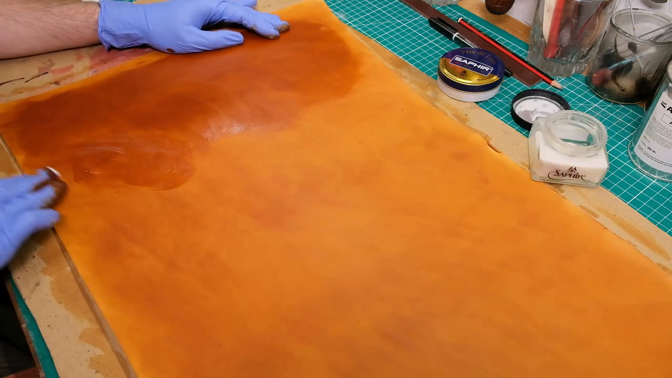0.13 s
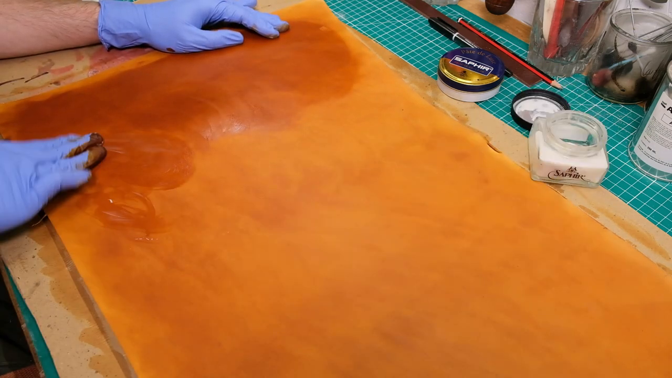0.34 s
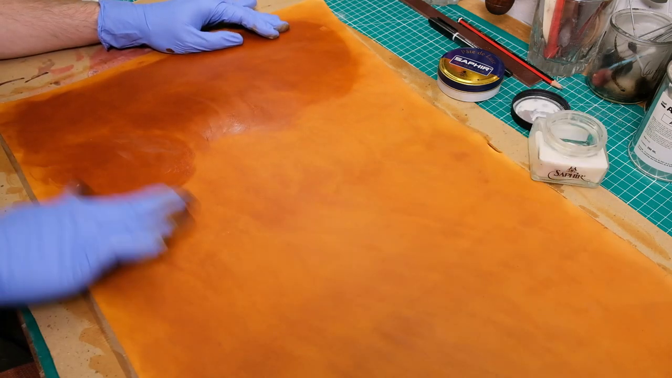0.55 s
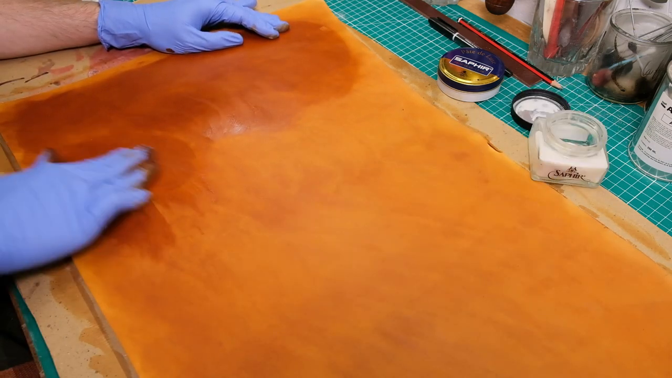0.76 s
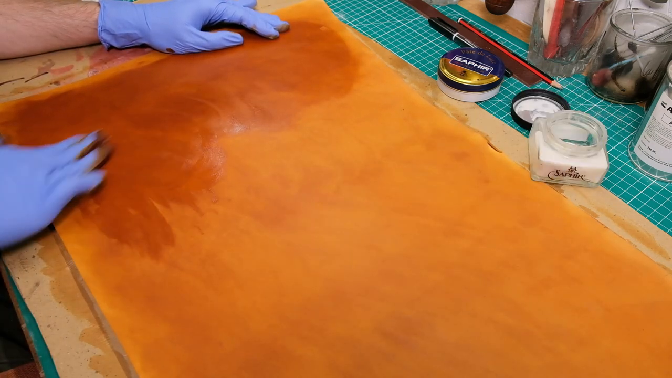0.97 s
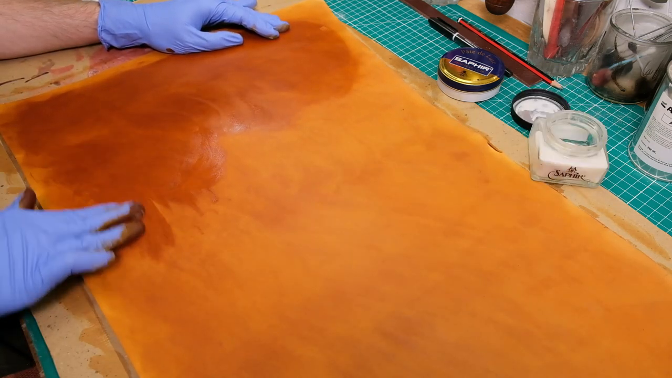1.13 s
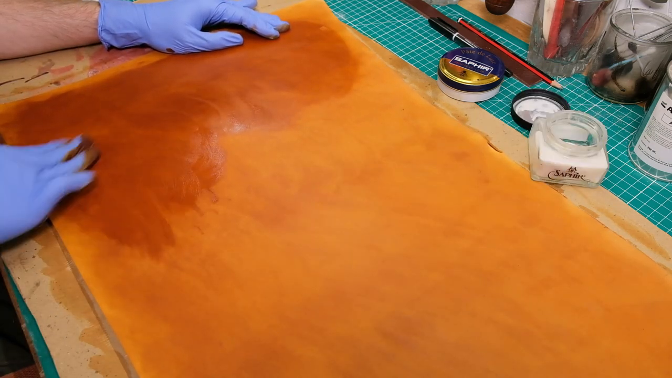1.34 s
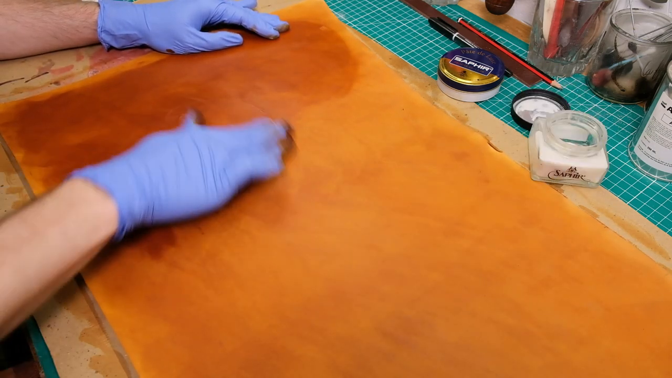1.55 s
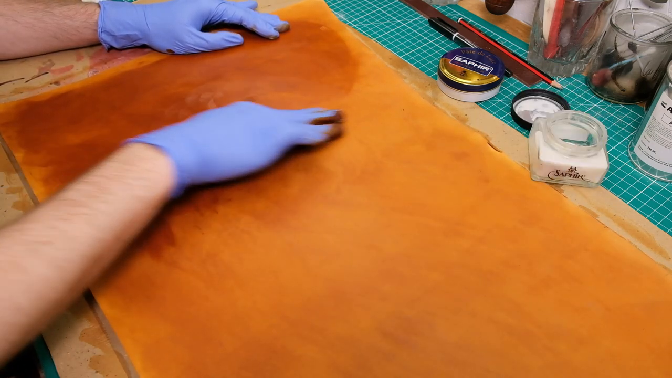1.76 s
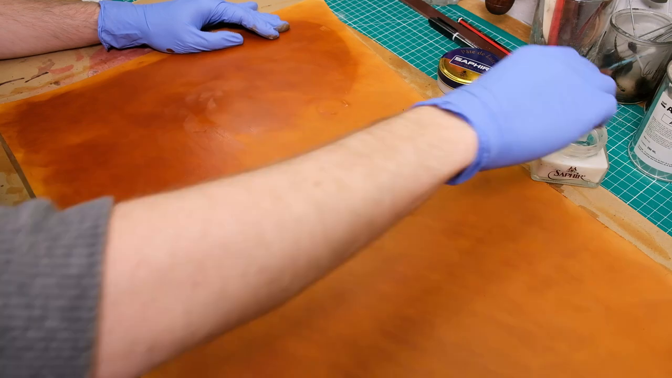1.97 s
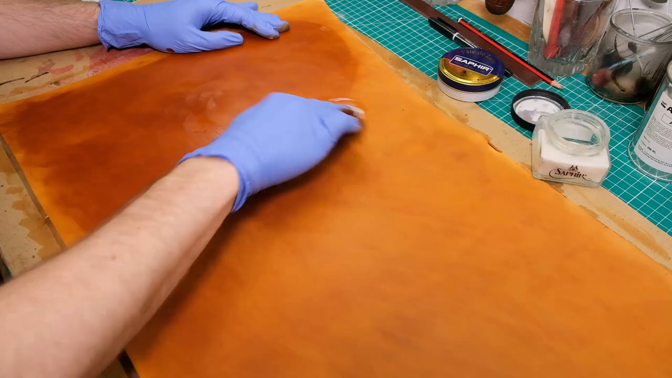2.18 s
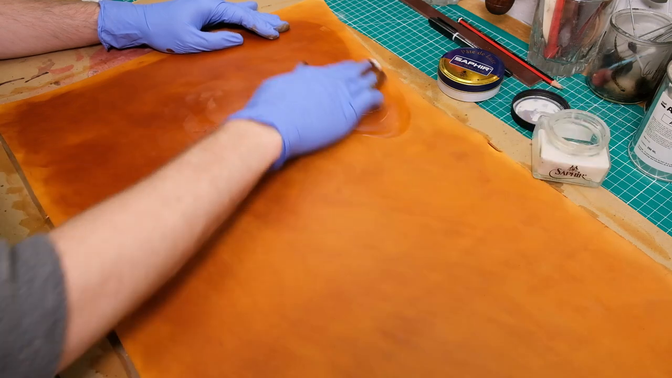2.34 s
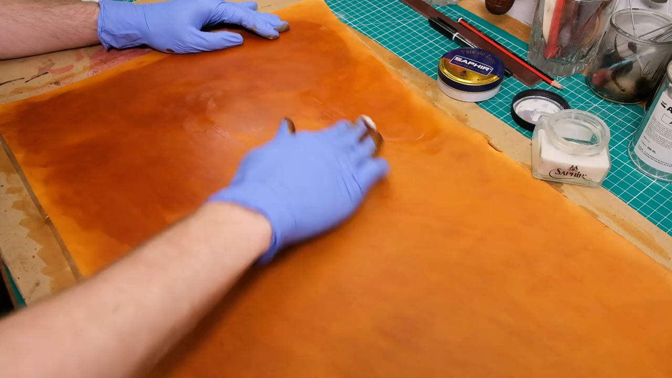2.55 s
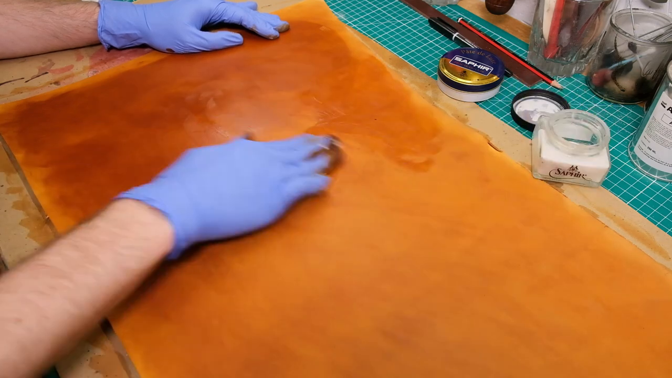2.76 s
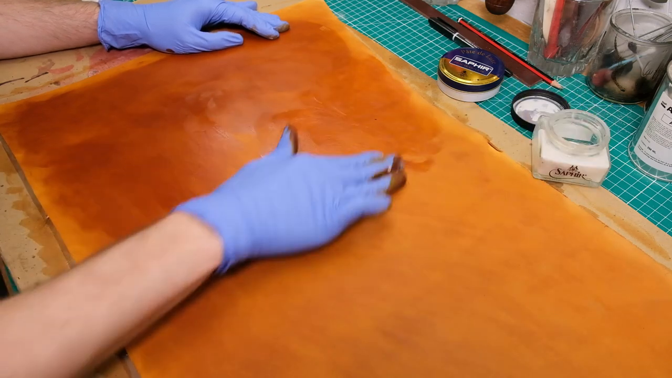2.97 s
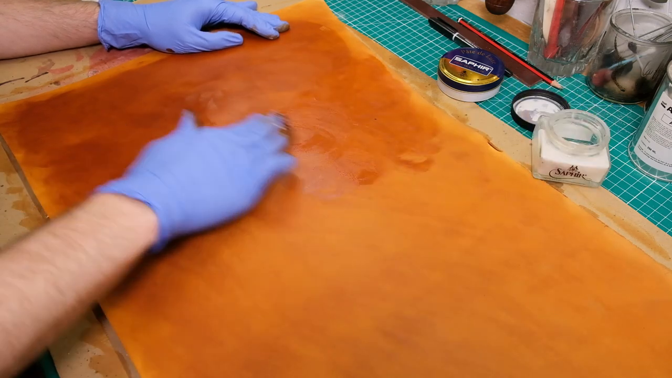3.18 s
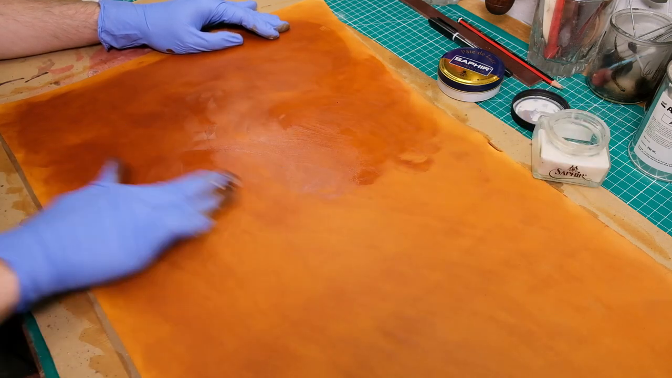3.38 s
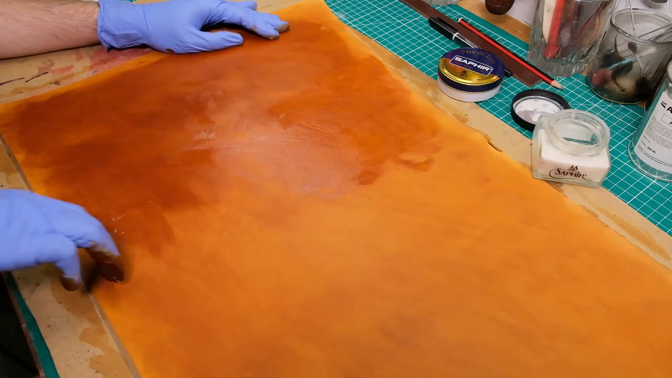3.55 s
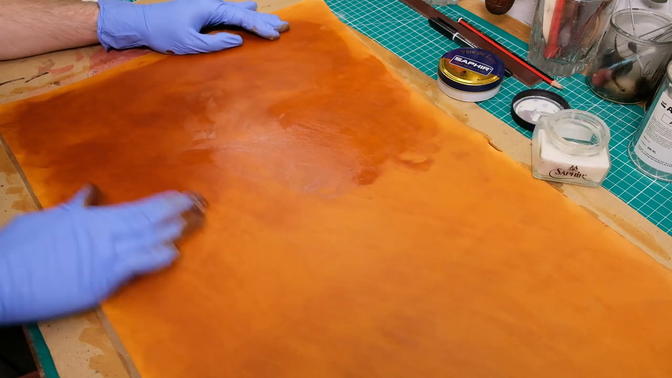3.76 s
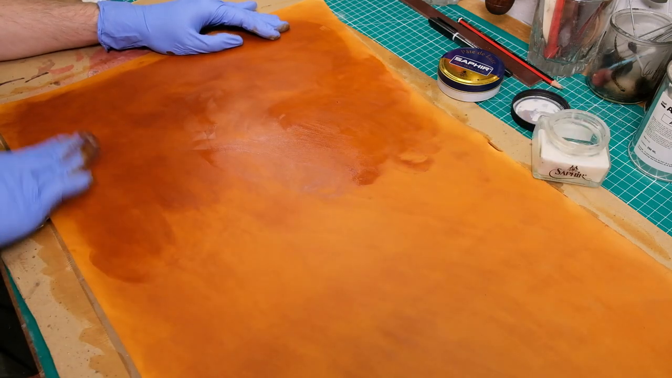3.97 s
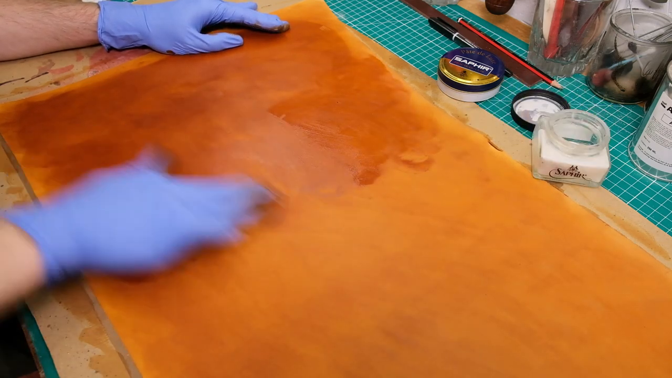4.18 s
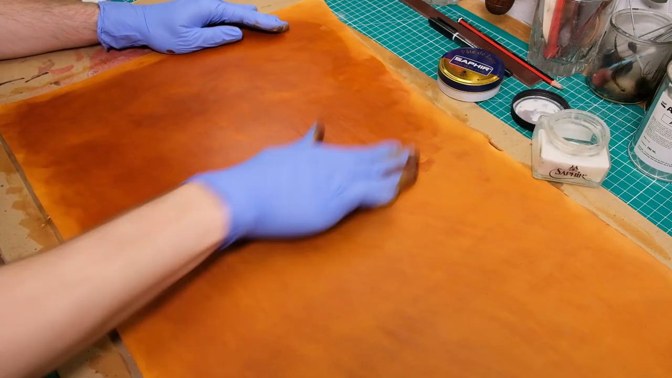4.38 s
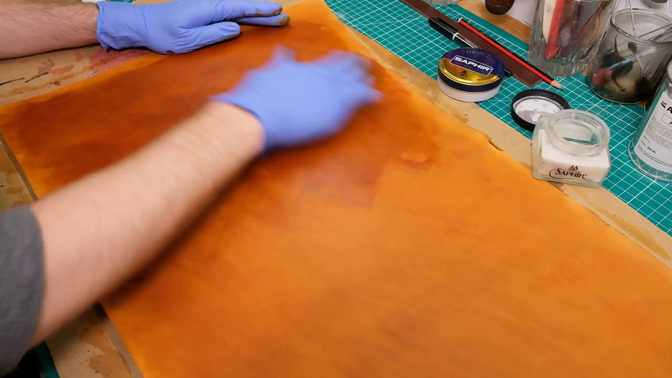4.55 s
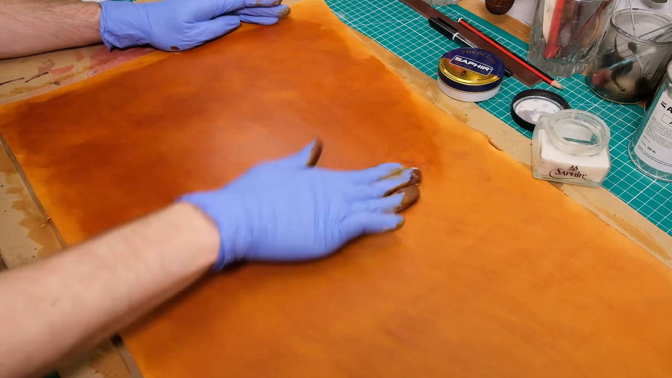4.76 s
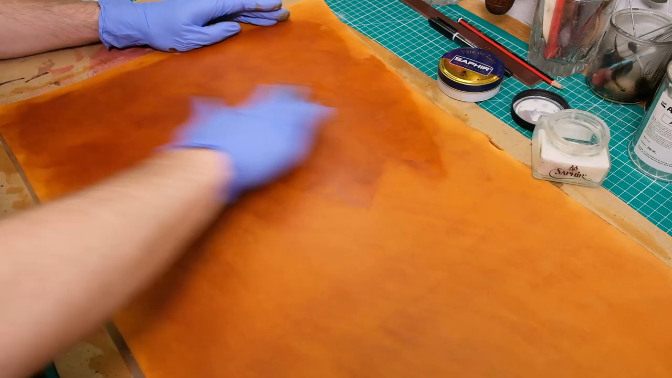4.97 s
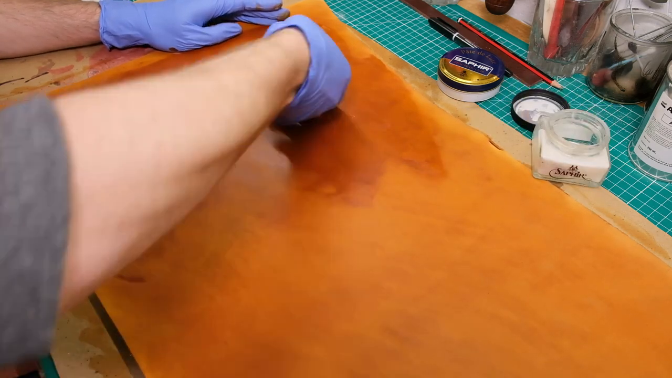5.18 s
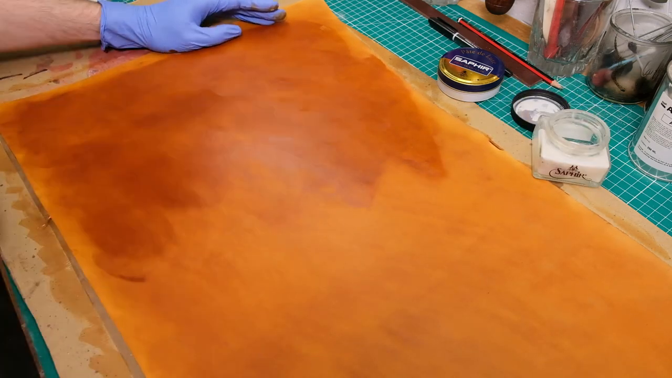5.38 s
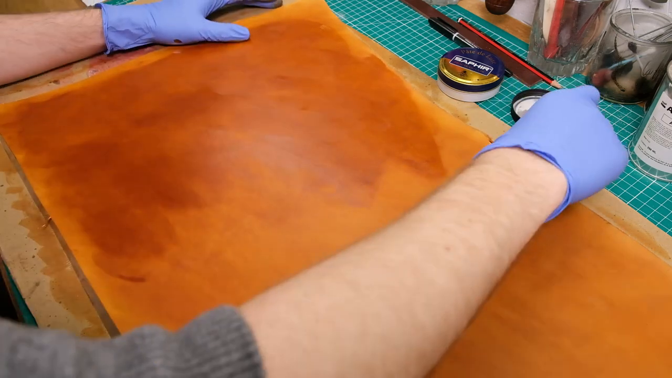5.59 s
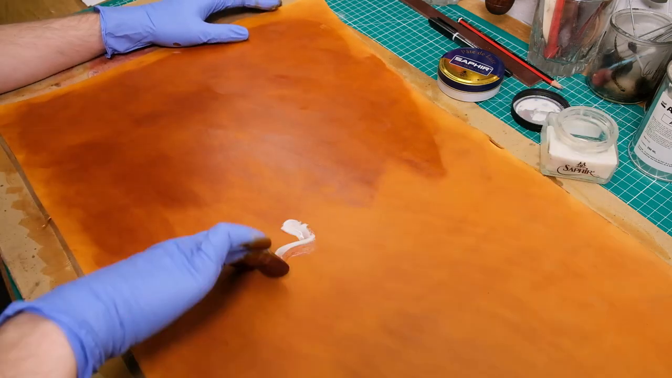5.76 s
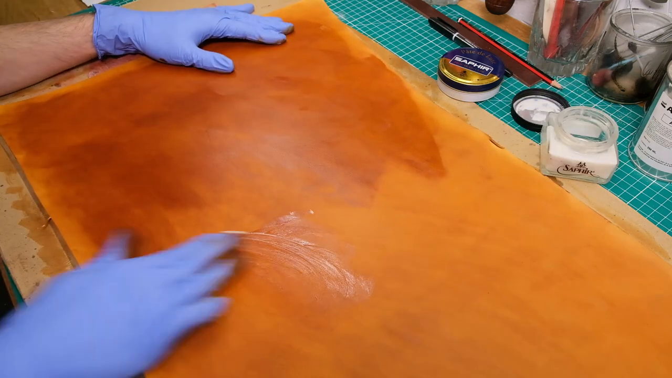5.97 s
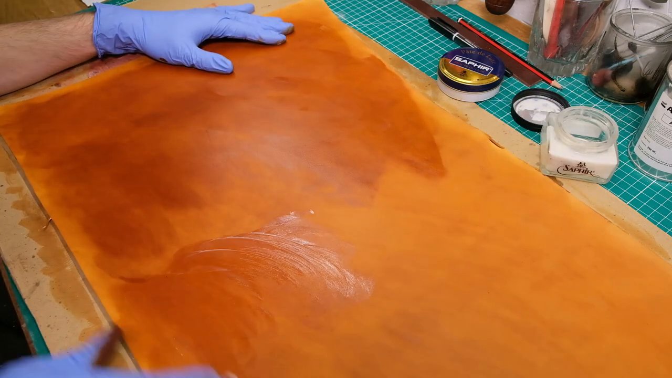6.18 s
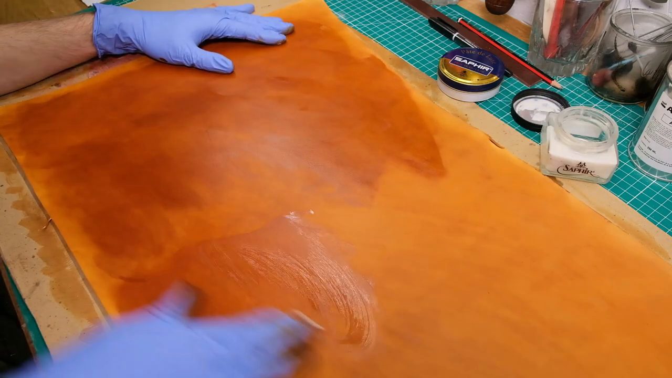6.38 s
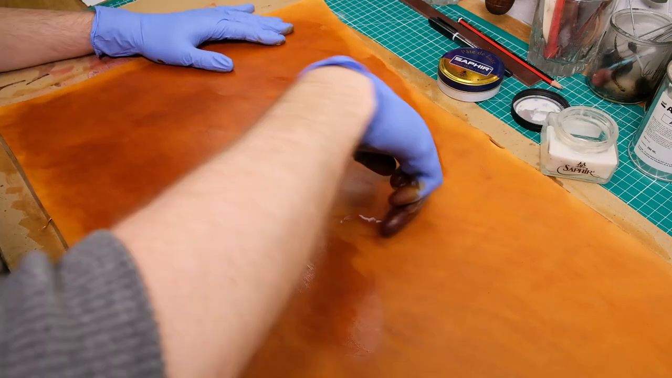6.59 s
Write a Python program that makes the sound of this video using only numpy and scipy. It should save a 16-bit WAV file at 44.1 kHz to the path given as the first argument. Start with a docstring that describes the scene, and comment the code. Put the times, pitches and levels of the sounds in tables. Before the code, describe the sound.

A gloved hand rubs cream into leather at time-lapse speed. Tight bursts of airy hiss crowd the first second, then smoother drags follow, split by short lifts. Rubbing swells to its heaviest just past four seconds, with table rumble, dull drumming and soft thuds, then eases into lighter strokes. Tiny wet pops appear occasionally. Close mono pickup, quiet indoor workspace, faint steady hiss behind.

```python
"""A gloved hand hisses over a leather sheet at time-lapse pace, working in cream in fast strokes, with lifts between.
The hiss is noise swelling with each stroke, ringing near 3.4 kHz and flickering band by band as the glove slips.
Under it the worktable rumbles and drums and the sheet rustles: three shaped noises that rise under a heavy hand.
Cream pops are short tones with a scuff and thump, finger thuds are soft sine cycles, and room hiss lies behind.
One microphone feeds both channels, with a narrow notch near 1 kHz and the top cut away."""
import sys
import numpy as np
from scipy import signal
from scipy.fft import rfft, irfft, next_fast_len
from scipy.io import wavfile
from scipy.ndimage import uniform_filter1d

SR = 44100
rng = np.random.default_rng(int(sys.argv[2]) if len(sys.argv) > 2 else 0)


def inscribe(sig):
    """Save sig as 16-bit PCM at rate SR to the path in sys.argv[1].

    A 1-D sig is mono; a 2-D sig holds one channel per row.
    Samples are clipped to [-1, 1] before scaling.
    """
    pcm = np.round(np.clip(np.atleast_2d(sig).T, -1, 1) * 32767)
    wavfile.write(sys.argv[1], SR, pcm.astype(np.int16))


N = 292383

# clear strokes, each a swell on top of the drag: full speed at t/s, level/dB of the swell, length t/s
STROKES = [(0.005, -56.5, 0.056), (0.07, -54, 0.025), (0.113, -54.5, 0.048), (0.161, -51.5, 0.06),
           (0.195, -54, 0.037), (0.236, -52, 0.056), (0.274, -53, 0.025), (0.338, -59.5, 0.04),
           (0.364, -51, 0.038), (0.418, -52, 0.023), (0.447, -48.5, 0.087), (0.515, -46, 0.041),
           (0.564, -51, 0.036), (0.614, -44, 0.034), (0.659, -45.5, 0.025), (0.704, -55, 0.025),
           (0.745, -48, 0.043), (0.787, -47.5, 0.053), (0.84, -56, 0.035), (0.878, -54.5, 0.052),
           (0.913, -50, 0.036), (0.952, -54.5, 0.039), (0.989, -50, 0.019), (1.365, -49, 0.016),
           (1.411, -45, 0.017), (1.535, -46.5, 0.014), (1.724, -44, 0.014), (1.939, -63, 0.014),
           (1.978, -59, 0.033), (2.114, -63, 0.022), (2.294, -56.5, 0.054), (2.33, -49.5, 0.037),
           (2.369, -48.5, 0.048), (2.413, -54, 0.064), (2.549, -54, 0.034), (2.623, -51, 0.021),
           (2.899, -48, 0.024), (2.984, -51.5, 0.025), (3.132, -46.5, 0.013), (3.173, -49, 0.043),
           (3.581, -62.5, 0.019), (4.305, -38, 0.02), (4.345, -47, 0.02), (4.394, -42.5, 0.023),
           (4.433, -39.5, 0.019), (4.477, -40, 0.025), (4.516, -43.5, 0.094), (4.615, -48, 0.035),
           (4.66, -39.5, 0.038), (4.7, -43, 0.052), (4.753, -44, 0.02), (4.868, -46, 0.057),
           (4.9, -41, 0.058), (4.937, -42, 0.021), (4.956, -40.5, 0.02), (4.976, -47, 0.022),
           (5.011, -47, 0.021), (5.031, -50, 0.049), (5.2, -64, 0.012), (5.308, -44.5, 0.024),
           (5.328, -52, 0.025), (5.355, -46.5, 0.11), (5.468, -49.5, 0.032), (5.494, -49.5, 0.04),
           (5.656, -62, 0.043), (5.797, -64, 0.022), (5.823, -62, 0.013), (5.858, -57, 0.051),
           (6.012, -49, 0.014), (6.044, -48, 0.027), (6.082, -52, 0.064), (6.156, -54, 0.039),
           (6.223, -52, 0.021), (6.267, -51.5, 0.024), (6.307, -46, 0.038), (6.35, -52, 0.03),
           (6.515, -47, 0.029), (6.552, -49.5, 0.057)]
# drag between the clear strokes, one curve for each pass between lifts: t/s, level/dB
DRAG_PASSES = [
    [(0, -61), (.27, -61.5), (.3, -64), (.4, -70.5), (.72, -69), (.85, -63), (1.08, -47.5), (1.17, -53),
     (1.3, -48), (1.7, -45.5), (1.866, -46.5), (1.884, -71)],
    [(2.0, -67.5), (2.07, -77.5), (2.17, -78), (2.19, -66), (2.25, -58.5), (2.33, -70), (2.46, -56),
     (2.69, -53), (2.725, -65), (2.76, -58), (2.82, -53.5), (2.97, -55.5), (3.06, -45.5), (3.2, -55),
     (3.4, -47), (3.455, -46), (3.478, -59)],
    [(3.56, -69), (3.65, -63), (3.78, -46), (3.86, -49), (3.97, -42), (4.15, -39), (4.3, -41), (4.73, -44),
     (4.8, -38), (4.95, -43.5), (5.05, -41.5), (5.18, -63.5)],
    [(5.24, -75), (5.278, -61), (5.284, -49.5), (5.31, -51.5), (5.375, -44.5), (5.421, -43.5),
     (5.432, -57.5)],
    [(5.56, -62), (5.6, -79.5), (5.77, -70), (5.88, -65.5), (5.94, -52), (6.1, -53), (6.19, -47),
     (6.25, -52), (6.42, -44.5), (6.5, -49), (6.56, -53), (6.59, -67), (6.63, -59)],
]
# colour of the glove's contact: t/s, treble level/dB, level/dB of the body below the hollow
CONTACT_COLOUR = [(0, -3.5, 4), (3.4, -5, 4.5), (3.8, -2, 5.5), (4.2, -4, 1.5), (4.75, -6, 2),
                  (4.9, -3, -0.5), (5.42, -4.5, 4.5), (5.44, -10.5, 4.5), (5.78, -7, 6), (5.95, -2, 7),
                  (6.63, 0, 6.5)]
# spectrum of the glove's hiss before its resonance and tilt: f/Hz, relative level/dB per Hz
HISS_SPECTRUM = [(850, -24.5), (1340, -15.5), (2400, -10.5), (4400, -9), (7000, -8.5), (12500, -11.5),
                 (15600, -16)]
# spectrum of the table's rumble: f/Hz, relative level/dB per Hz
RUMBLE_SPECTRUM = [(11, -51), (18, -1.5), (43, 0.5), (75, -4.5), (150, -15), (340, -50.5)]
# spectrum of the rustling sheet and sleeve: f/Hz, relative level/dB per Hz
RUSTLE_SPECTRUM = [(150, -46), (260, 0), (500, -2.5), (800, -5.5), (1200, -15.5), (2500, -31)]
# table under a light hand: level/dB of rumble, of drumming, of rustle
LIGHT_HAND_DB = [-60.5, -69, -71.5]
# table under a heavy hand: dB of rumble, of drumming, of rustle gained per dB of hiss above HEAVY_DB
HEAVY_HAND_SLOPES = [0.73, 1.26, 0.6]
# slow swells and short bumps of the table noises: t/s, half length t/s,
# change in level/dB of rumble, of drumming, of rustle
TABLE_SWELLS = [(0.625, 0.091, 8.5, -6, -4), (3.505, 0.66, 3.5, -1, 0), (4.94, 0.067, 7.5, -1.5, -1),
                (5.3, 0.1, 10.5, 3, 0), (5.453, 0.073, 2, 6.5, 14.5), (6.556, 0.077, 7, 1.5, 5.5)]
# cream pops and knocks: t/s, tone peak level/dB, tone f/Hz, length t/s, scuff level/dB, thump level/dB
POPS = [(0.547, -42.5, 1350, 0.0055, -48, -35), (2.183, -61, 1710, 0.019, -58.5, -45),
        (3.431, -58, 593, 0.02, -64, -63), (5.651, -61.5, 326, 0.038, -61, -43.5),
        (6.112, -60, 1450, 0.01, -47.5, -49), (6.437, -54, 606, 0.023, -110, -46)]
# dull thuds of the hand through the table: t/s, peak level/dB, f/Hz
THUDS = [(4.12, -46, 153), (4.255, -41.5, 136), (4.52, -46, 172), (4.65, -44, 167), (4.86, -49.5, 180),
         (5.06, -46, 144), (5.41, -48.5, 444), (5.443, -46, 206), (5.472, -46, 377), (5.5, -51, 300)]

RISE_SHARE = 0.41     # part of a stroke spent speeding up
SWELL_POWER = 1.8     # lower makes the start and stop more sudden
FAINT_DB, FAINT_LOW_HZ, FAINT_HIGH_HZ = 3, 16.4, 45.4     # fainter, irregular strokes within the drag
# cavity under the cupped fingers: it shifts with the grip, and sits lower as the body grows
HOLLOW_HZ, HOLLOW_HZ_PER_BODY_DB, HOLLOW_WANDER_HZ = 3578, -33.4, 129
HOLLOW_WIDTH_HZ, HOLLOW_DB = 530, 5
TILT_PIVOT_HZ = 3300     # body below, treble above
HEAVY_DB, HEAVY_S = -47.5, 0.24     # above this hiss, averaged over this long, the hand bears on the table
DRUM_HZ, DRUM_WIDTH_HZ = 133, 86     # broad mode of the table top
THUMP_HZ, THUMP_T60_S, THUMP_RISE_S = 60, 0.013, 0.0026
THUD_CYCLES = 3.04
ROOM_HISS_DB, ROOM_LOW_HZ, ROOM_DULL_HZ = -78.5, 2500, 13300
NOTCH_HZ, NOTCH_WIDTH_HZ, NOTCH_DEPTH = 974, 160, 0.93
CUTOFF_HZ = 15760


def stroke_db():
    """The drag of each pass carries faint strokes; each clear stroke adds a smooth swell of speed."""
    drag_db = in_time(*np.transpose(np.concatenate(DRAG_PASSES)))
    faint_db = FAINT_DB * np.tanh(wobble(FAINT_LOW_HZ, FAINT_HIGH_HZ))
    speed = from_db(drag_db + faint_db)
    for s, db, length_s in STROKES:
        edges_s = s + length_s * np.array([-RISE_SHARE, 0, 1 - RISE_SHARE])
        at = np.arange(max(round(edges_s[0] * SR), 0), round(edges_s[2] * SR))
        phase = np.interp(at / SR, edges_s, [0, np.pi / 2, np.pi])
        speed[at] += from_db(db) * np.sin(phase) ** SWELL_POWER
    return 20 * np.log10(speed)


def glove(level_db, patchy_db, body_lag, low_lag, treble_lead):
    """Countless micro-slips of rubber on grain make a hiss; each band flickers on its own."""
    s, treble_db, body_db = np.transpose(CONTACT_COLOUR)
    treble_db, body_db = in_time(s, treble_db), in_time(s, body_db)
    hiss = coloured(rng.standard_normal(N), HISS_SPECTRUM)

    hollow_hz = HOLLOW_HZ + HOLLOW_HZ_PER_BODY_DB * body_db + HOLLOW_WANDER_HZ * wobble(1.6, 24.0)
    hollow_gain = from_db(HOLLOW_DB + 1.64 * wobble(6.5, 33.0))
    hiss = rms_one(hiss + hollow_gain * moving_resonance(hiss, hollow_hz, HOLLOW_WIDTH_HZ))

    # faster strokes sound brighter and thinner
    above_mean_db = level_db - level_db.mean()
    treble_db = treble_db + treble_lead * above_mean_db
    body_db = body_db - body_lag * above_mean_db

    size = next_fast_len(N)
    spectrum, out = rfft(hiss, size), np.zeros(N)
    bin_hz = np.arange(size // 2 + 1) * SR / size
    place = np.clip(4 * np.log2(bin_hz / 1000 + 1e-9), 0, 16)
    for k in range(17):     # overlapping quarter-octave bands from 1 kHz up; the lowest takes all below
        hz = 1000 * 2 ** (k / 4)
        part = irfft(spectrum * np.clip(1 - np.abs(place - k), 0, 1), size)[:N]
        body_share = np.clip(np.log2(TILT_PIVOT_HZ / hz), 0, 1)
        treble_share = np.clip(np.log2(hz / TILT_PIVOT_HZ), 0, 1)
        low_share = np.clip(2 * np.log2(1450.0 / hz), 0, 1)
        tilt_db = body_db * body_share + treble_db * treble_share
        tilt_db = tilt_db - low_lag * above_mean_db * low_share     # the lowest bands follow speed less
        out += part * from_db(tilt_db + patchy_db * wobble(0.51, 29.6))
    return from_db(level_db) * out


def table(level_db, follow, push_db):
    """Rumble, drumming and rustle come in lumps and rise under a heavy hand; rustle partly tracks strokes."""
    heavy_db = np.clip(uniform_filter1d(level_db, size=round(HEAVY_S * SR)) - HEAVY_DB, 0, None)
    levels_db = np.c_[LIGHT_HAND_DB] + np.c_[HEAVY_HAND_SLOPES] * heavy_db
    for s, half_s, *change_db in TABLE_SWELLS:
        swell = np.sin(in_time([s - half_s, s + half_s], [0, np.pi]))
        levels_db = levels_db + np.c_[change_db] * swell
    rumble_db, drum_db, rustle_db = levels_db

    rumble_gain = from_db(rumble_db + 0.62 * wobble(4.7, 29.0))
    rumble = coloured(rng.standard_normal(N), RUMBLE_SPECTRUM) * rumble_gain

    # each clear stroke after the first starts with a push, harder the deeper its swell
    at = (np.array(STROKES)[1:, 0] * SR).astype(int)
    swell_db = np.clip(level_db[at] - level_db[at - round(0.022 * SR)], 0, 20)
    pushes = rng.standard_normal(N)
    pushes[at - round(0.012 * SR)] += from_db(push_db + 0.5 * swell_db)
    top = resonance(resonance(pushes, DRUM_HZ, DRUM_WIDTH_HZ), DRUM_HZ, DRUM_WIDTH_HZ)
    drum = rms_one(top) * from_db(drum_db + 2.8 * wobble(2.8, 21.0))

    quick_db = level_db - uniform_filter1d(level_db, size=8000)
    rustle_gain = from_db(rustle_db + follow * quick_db + 2.45 * wobble(1.25, 30.0))
    rustle = coloured(rng.standard_normal(N), RUSTLE_SPECTRUM) * rustle_gain
    return rumble + drum + rustle


def pops():
    """A short rounded tone for the bursting cream, a sudden scuff that dies, a dull push into the table."""
    out = np.zeros(N)
    t = np.arange(SR // 10) / SR
    thump_shape = from_db(-60 * t / THUMP_T60_S) * (1 - np.exp(-t / THUMP_RISE_S))
    thump = -np.sin(2 * np.pi * THUMP_HZ * t) * thump_shape
    thump = thump / np.abs(thump).max()
    for s, peak_db, hz, length_s, scuff_db, thump_db in POPS:
        tone = np.sin(np.pi * np.clip(t / length_s, 0, 1)) * np.sin(2 * np.pi * hz * t)
        scuff = rms_one(band(rng.standard_normal(len(t)), hz / 1.8, hz * 1.17)) * np.exp(-t / length_s)
        start, late = round(s * SR), round((s + 0.0025) * SR)     # the thump follows 2.5 ms later
        out[start:start + len(t)] += from_db(peak_db) * tone + from_db(scuff_db) * scuff
        out[late:late + len(t)] += from_db(thump_db) * thump
    return out


def thuds():
    """The hand knocks through the table: a few soft sine cycles each, of either sign."""
    out = np.zeros(N)
    for (s, peak_db, hz), sign in zip(THUDS, rng.choice([-1, 1], len(THUDS))):
        cycles = np.arange(0, THUD_CYCLES, hz / SR)
        swell = np.sin(np.pi * cycles / THUD_CYCLES)
        start = round(s * SR)
        out[start:start + len(cycles)] += sign * from_db(peak_db) * swell * np.sin(2 * np.pi * cycles)
    return out


def room_hiss():
    """Steady band-passed noise behind everything."""
    return from_db(ROOM_HISS_DB) * rms_one(band(rng.standard_normal(N), ROOM_LOW_HZ, ROOM_DULL_HZ))


def from_db(db):
    """Decibels to gain."""
    return 10 ** (np.asarray(db) / 20)


def rms_one(x):
    """Scales to rms 1."""
    return x / np.sqrt(np.mean(x ** 2) + 1e-20)


def in_time(s, values):
    """A curve over seconds, read at every sample."""
    return np.interp(np.arange(N) / SR, s, values)


def coloured(x, spectrum):
    """Shapes x by a spectrum read on a log-frequency axis; rms 1."""
    size = next_fast_len(N)
    hz, db = np.transpose(spectrum)
    bin_hz = np.arange(size // 2 + 1) * SR / size
    shape_db = np.interp(np.log(bin_hz + 1), np.log(hz), db, left=-60)
    return rms_one(irfft(rfft(x, size) * from_db(shape_db), size)[:N])


def band(x, low_hz, high_hz):
    """Band-pass."""
    return signal.sosfilt(signal.butter(2, [low_hz, high_hz], "band", fs=SR, output="sos"), x)


def wobble(low_hz, high_hz):
    """Random drift between two rates, rms 1; a second of run-in lets the filter settle."""
    return rms_one(band(rng.standard_normal(N + SR), low_hz, high_hz)[SR:])


def resonator(hz, width_hz):
    """Two-pole resonance coefficients, with gain about 1 at the peak."""
    r = np.exp(-np.pi * width_hz / SR)     # pole radius
    return np.array([1, 0, -1]) * (1 - r * r) / 2, [1, -2 * r * np.cos(2 * np.pi * hz / SR), r * r]


def resonance(x, hz, width_hz):
    """A fixed resonance."""
    return signal.lfilter(*resonator(hz, width_hz), x)


def moving_resonance(x, hz, width_hz, size=256):
    """A resonance whose centre follows hz, block by block."""
    out, state = np.zeros(N), np.zeros(2)
    for i in range(0, N, size):
        out[i:i + size], state = signal.lfilter(*resonator(hz[i], width_hz), x[i:i + size], zi=state)
    return out


def scene():
    """Everything reaches one microphone, sent to both channels."""
    level_db = stroke_db()
    mono = glove(level_db, patchy_db=1.58, body_lag=0.3, low_lag=0.17, treble_lead=0.11)
    mono = mono + table(level_db, follow=0.35, push_db=21.0)
    mono = mono + pops() + thuds() + room_hiss()
    return np.stack([mono, mono])


def record(dry):
    """Subtracting a resonance leaves a narrow notch near 1 kHz; a steep low-pass then cuts the top."""
    ringing = np.stack([resonance(side, NOTCH_HZ, NOTCH_WIDTH_HZ) for side in dry])
    notched = dry - NOTCH_DEPTH * ringing
    return signal.sosfilt(signal.ellip(12, 0.5, 75, CUTOFF_HZ, fs=SR, output="sos"), notched)


dry = scene()
out = record(dry)
inscribe(out)
```